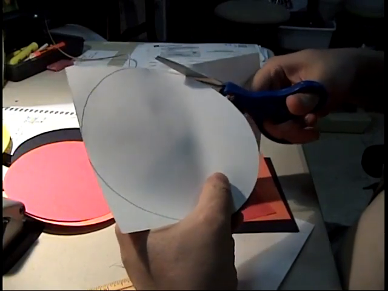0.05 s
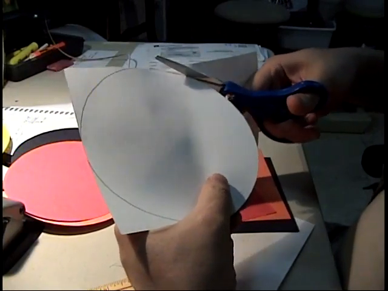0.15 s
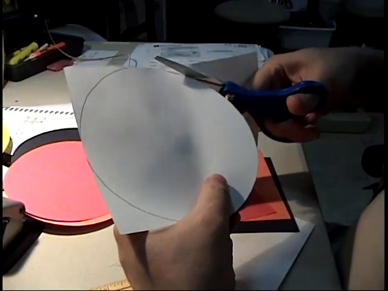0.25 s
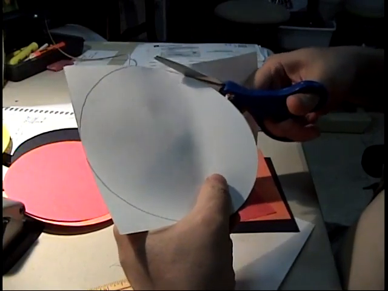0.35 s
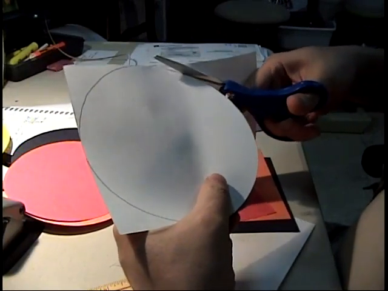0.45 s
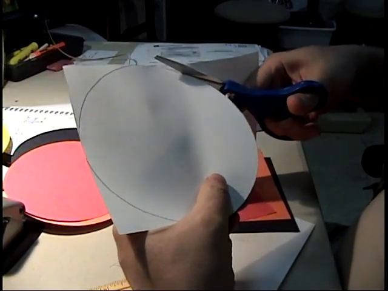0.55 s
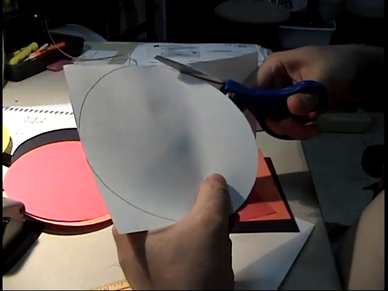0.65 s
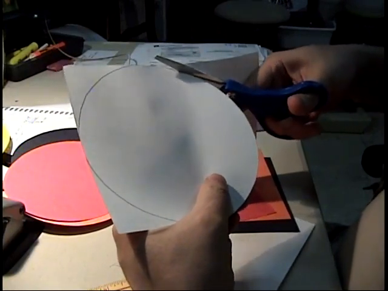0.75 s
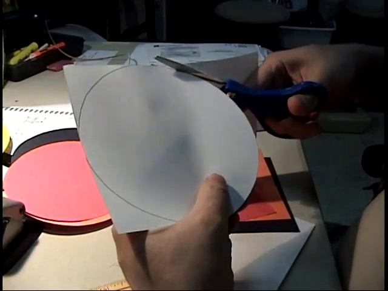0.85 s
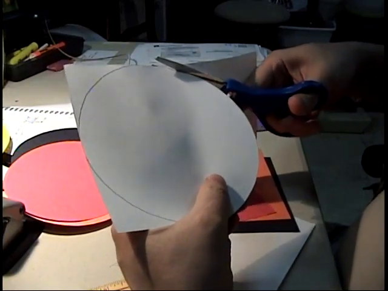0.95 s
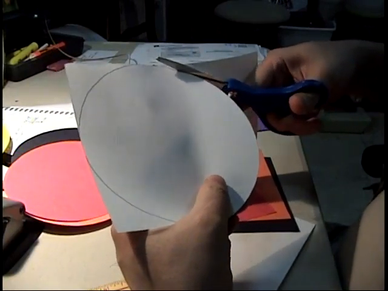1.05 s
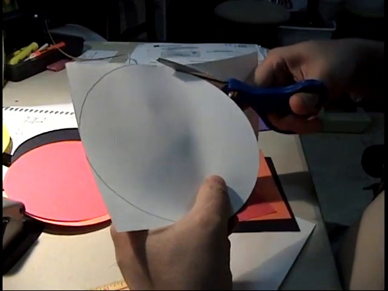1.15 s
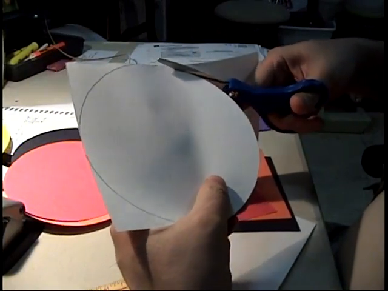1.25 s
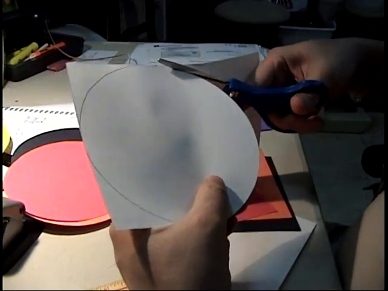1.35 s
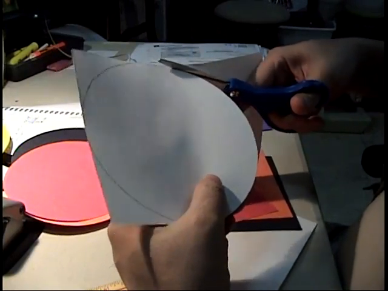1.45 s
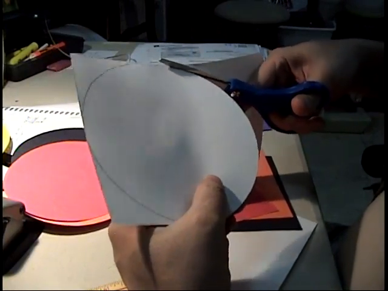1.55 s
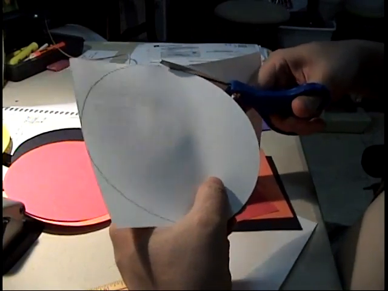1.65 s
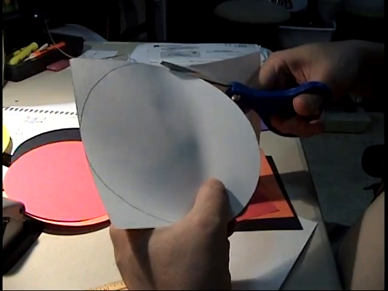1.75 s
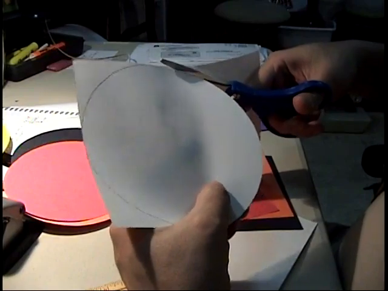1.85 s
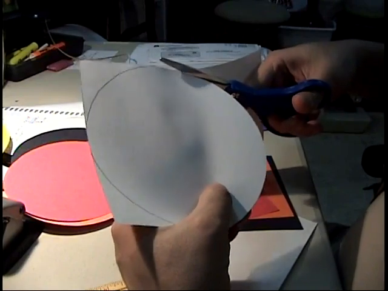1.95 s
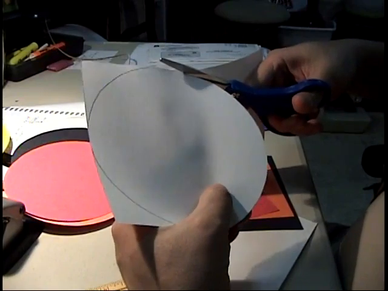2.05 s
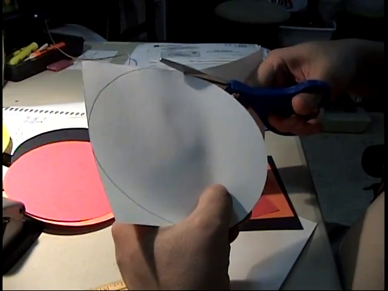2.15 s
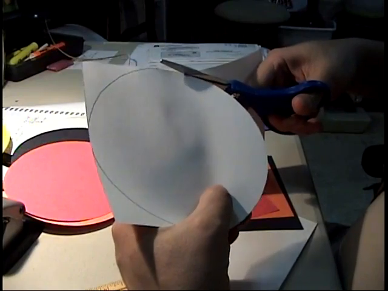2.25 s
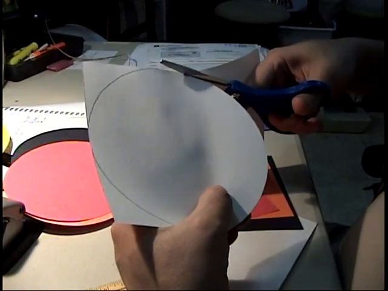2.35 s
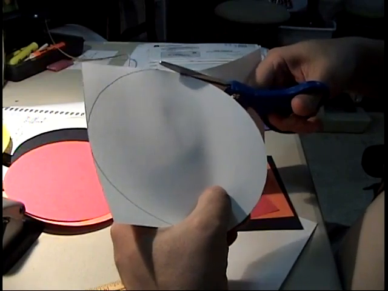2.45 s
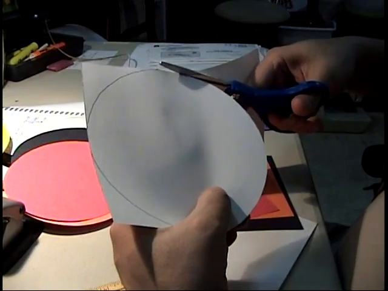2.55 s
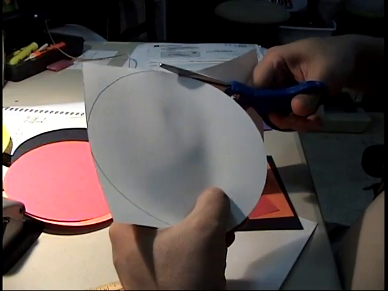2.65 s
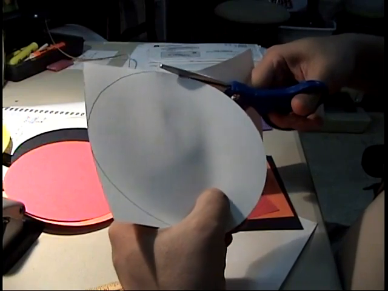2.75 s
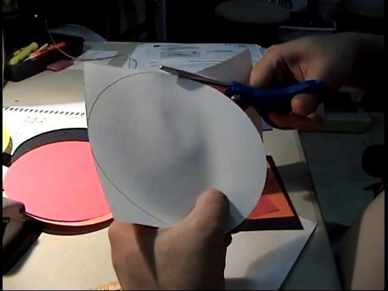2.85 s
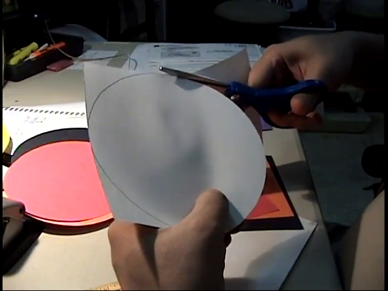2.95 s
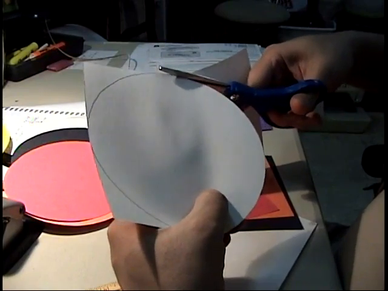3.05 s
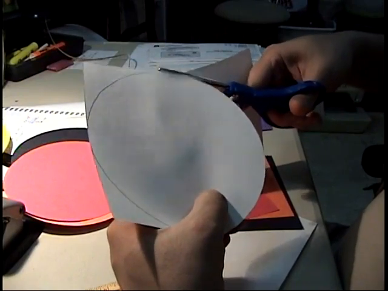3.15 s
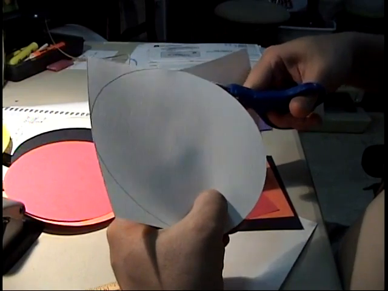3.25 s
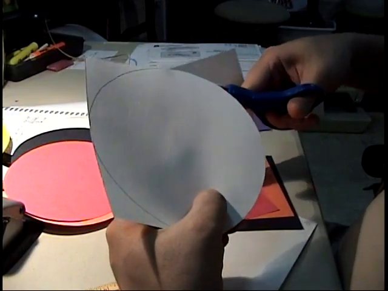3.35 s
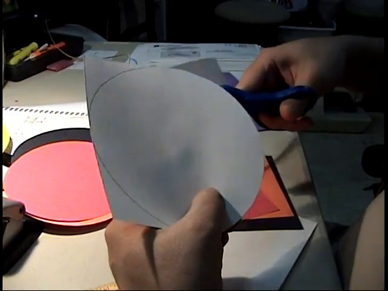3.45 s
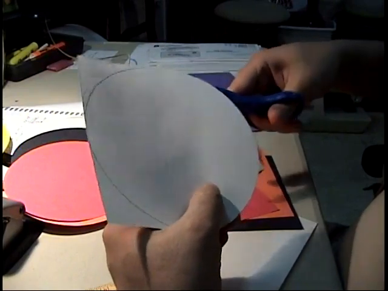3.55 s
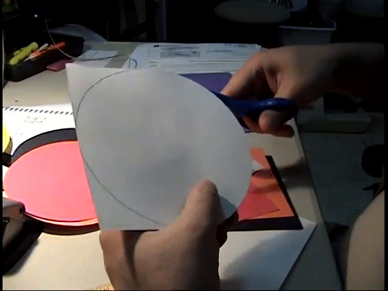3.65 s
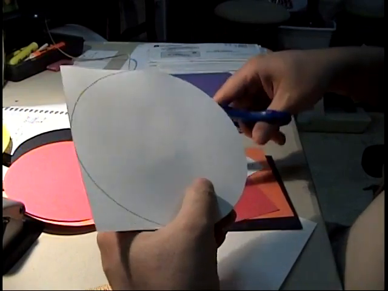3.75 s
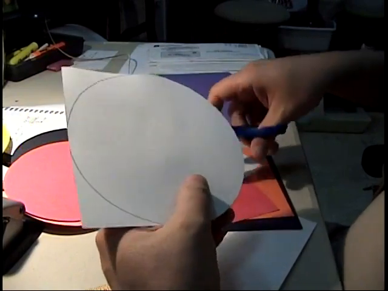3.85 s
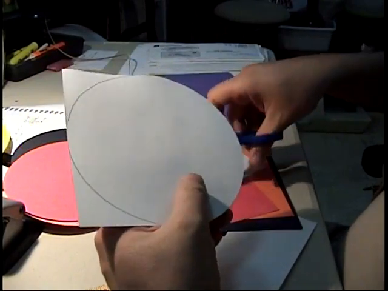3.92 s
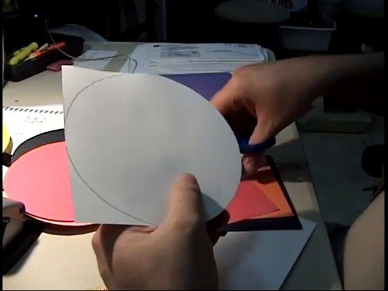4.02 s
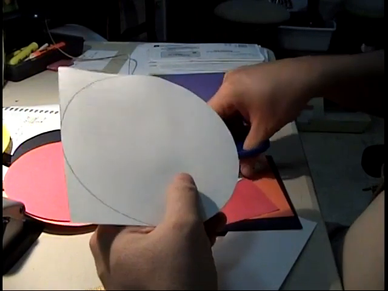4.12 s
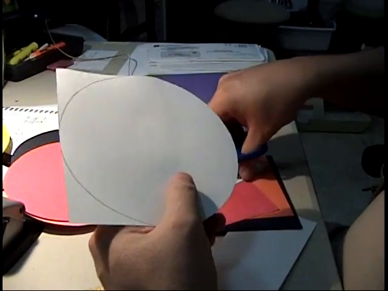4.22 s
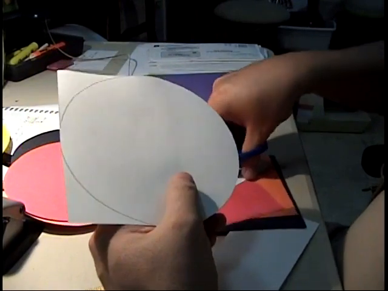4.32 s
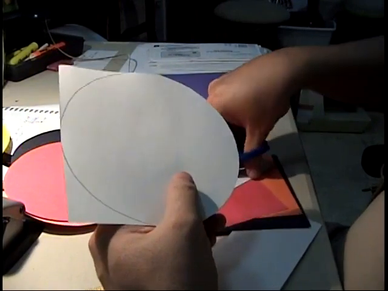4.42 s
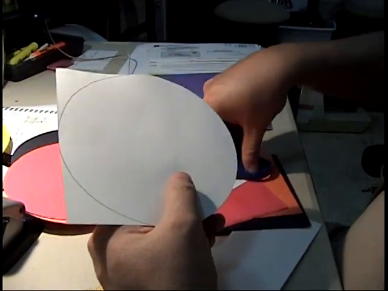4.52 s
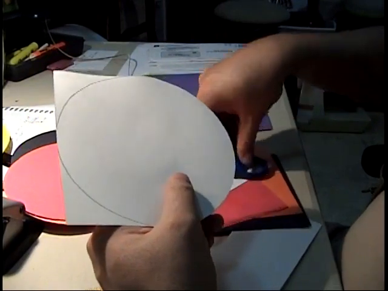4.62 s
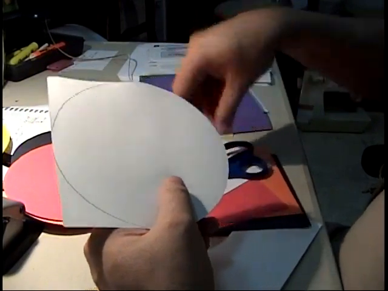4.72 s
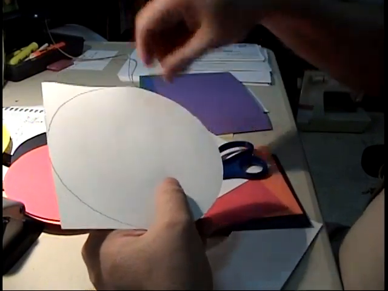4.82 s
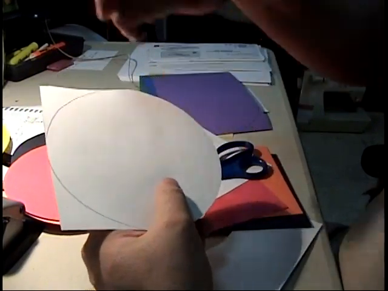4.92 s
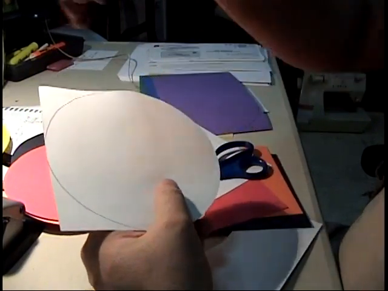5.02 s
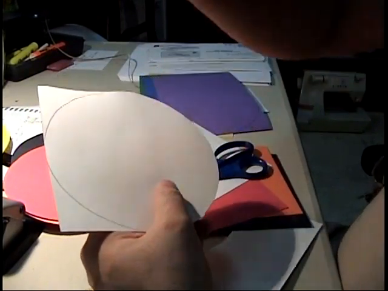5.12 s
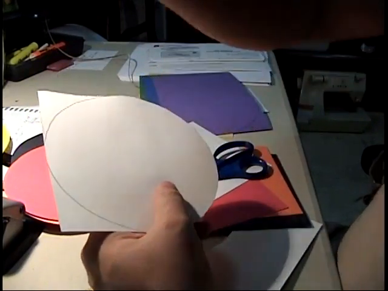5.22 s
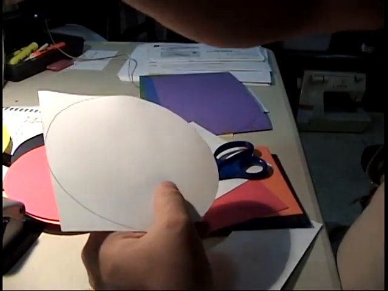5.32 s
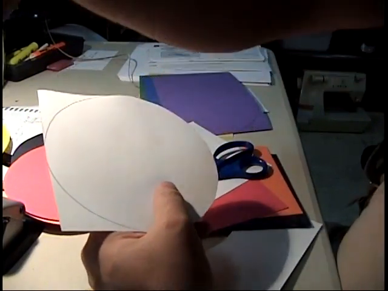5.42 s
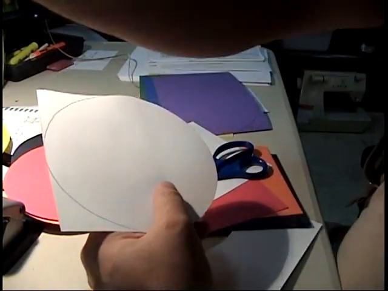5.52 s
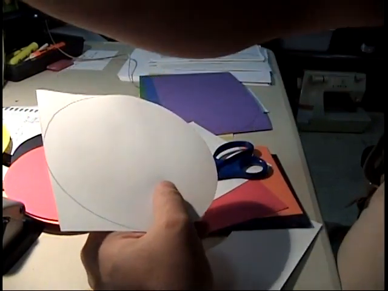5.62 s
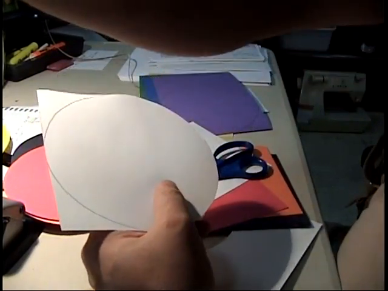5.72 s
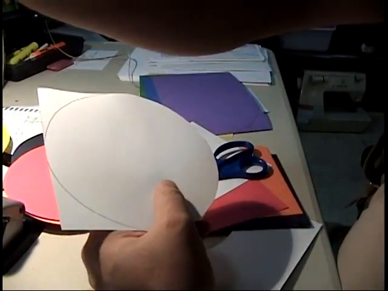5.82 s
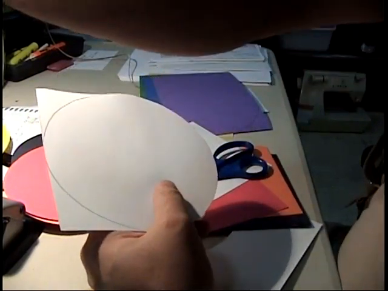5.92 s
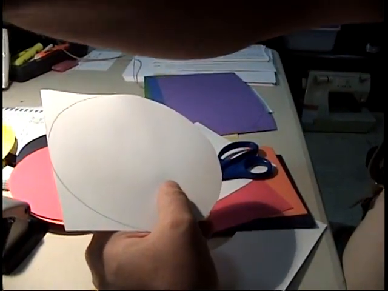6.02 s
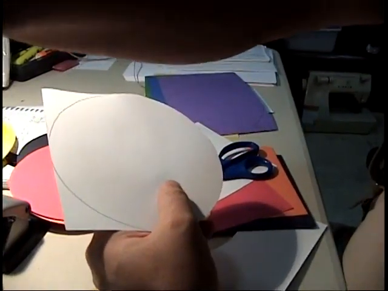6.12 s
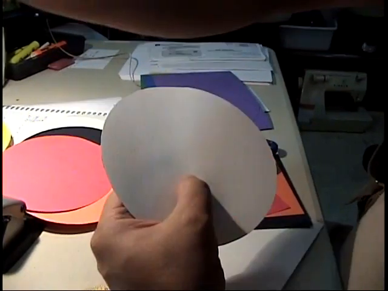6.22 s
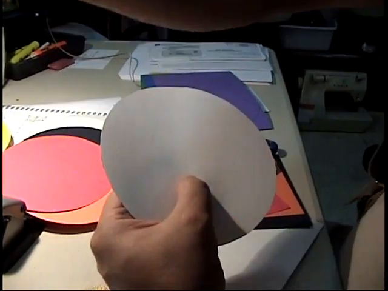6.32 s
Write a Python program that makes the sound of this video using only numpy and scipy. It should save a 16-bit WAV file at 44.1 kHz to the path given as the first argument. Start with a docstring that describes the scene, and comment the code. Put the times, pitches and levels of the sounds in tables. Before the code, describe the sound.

Crisp little scissor cuts and paper crinkles, a couple of knocks on a desk, then close plastic clicks in a quiet room.

```python
"""For three seconds scissors cut round a sheet of paper held over a desk: fibres snap in small bursts,
steel rasps on the edge, the sheet crinkles and the handles knock shut. Fingers brush the sheet.
At 4 s the scissors are laid down, clacking and booming in the desk top. An arm rustles across, and
near 6 s a hand clicks against plastic right by the microphones. A quiet room hums throughout,
with a thin electrical whine and a buzz that creeps up at the end."""
import sys
import numpy as np
from scipy import signal
from scipy.fft import rfft, irfft, next_fast_len
from scipy.io import wavfile
from scipy.ndimage import map_coordinates

SR = 44100
rng = np.random.default_rng(int(sys.argv[2]) if len(sys.argv) > 2 else 0)


def to_wav(s):
    """Save 16-bit WAV."""
    ch = np.atleast_2d(s).T  # columns
    pcm = np.round(np.clip(ch, -1, 1) * 32767)  # PCM
    wavfile.write(sys.argv[1], SR, pcm.astype(np.int16))


N = 281358

# Loudest bites into the paper. Each row: start in seconds, level in dB, length in seconds.
SNAPS = [(0.307, -34, 0.0046), (.314, -36.5, 0.0091), (.395, -40, 0.0034), (0.472, -41.5, 0.0085),
         (0.5054, -35, 0.01), (.56, -37.5, 0.0066), (0.593, -43, 0.011), (.635, -43.5, 0.005),
         (.661, -42.5, .005), (0.693, -40.5, 0.0031), (.759, -38.5, 0.0074), (1.021, -32.5, 0.013),
         (1.046, -39.5, .0096), (1.081, -36, 0.0044), (1.098, -37, 0.015), (1.214, -31.5, 0.0051),
         (1.2395, -33, 0.011), (1.285, -39, 0.015), (1.303, -37.5, .0075), (1.438, -30.5, 0.0098),
         (1.475, -33.5, 0.012), (1.487, -32, 0.0064), (2.401, -36, 0.005), (2.503, -40.5, .011),
         (2.864, -38.5, 0.0078), (2.99, -30.5, 0.0033), (3.013, -36, 0.0089), (3.0685, -27, 0.0084),
         (3.532, -43.5, 0.0044)]
# Each row: frequency in Hz, level in dB.
FIBRE_SPECTRUM = [(120, -47), (200, -9), (503, -6), (1070, 4), (1720, 0.5), (2950, -8.5), (3940, -6),
                  (4470, -23.5), (4980, -3.5), (5660, -9.5), (6300, -6), (8260, -14), (8880, -17.5),
                  (12700, -16.5), (15000, -53)]
# Each row: frequency in Hz, width in Hz, level in dB.
BLADE_MODES = [(4540, 150, 0), (6350, 300, -19), (8780, 300, -20)]
# How freely the blades ring. Each row: time in seconds, level in dB relative to the snap.
BLADE_RING = [(.3, -12), (.5, -6), (.68, 2.5), (.8, -3), (1.02, -13), (1.6, -20), (3.1, -18)]
SNAP_PIVOT_DB_PER_OCT, SNAP_TIP_DB_PER_OCT = 2, -1
USUAL_SNAP_DB, THINNING_PER_OCT = -42, 0.11


def cutting():
    """Each advance of the blades breaks a burst of fibres; the sheet radiates it and the steel rings."""
    out, t = np.zeros((2, N)), np.arange(SR // 16) / SR
    steel = ringing(BLADE_MODES, t)
    for s, db, length_s in SNAPS + slips():
        tilt = cut_tilt(s, SNAP_PIVOT_DB_PER_OCT, SNAP_TIP_DB_PER_OCT)
        tilt += THINNING_PER_OCT * (USUAL_SNAP_DB - db)  # smaller snaps are thinner
        envelope = np.exp(-2 * t / length_s) * (1 - np.exp(-t / 0.00039))
        ruptures = fibres(len(t), spiky_db=4.5) * envelope
        sheet = unit(coloured(ruptures, tilted(FIBRE_SPECTRUM, tilt)))
        blade = unit(convolved(ruptures, steel))
        burst = sheet + amp(at_time(BLADE_RING, s)) * blade
        add(out, s, amp(db - 3.5) * burst * np.sqrt(np.mean(envelope ** 2)))
    return spread(out, NEAR_SIDE)


# Each row: start in seconds, end in seconds, slip level in dB.
SQUEEZES = [(0.512, .74, -47.5), (0.772, .8, -38.5), (1.221, 1.34, -41), (2.291, 2.391, -48),
            (2.55, 2.866, -50.5)]
SLIPS_PER_S, SLIP_S, SLIP_SCATTER_DB = 45, 0.0052, 2


def slips():
    """Squeezed blades stick and slip, giving more rows of tiny snaps."""
    return [(s, db + SLIP_SCATTER_DB * rng.standard_normal(), SLIP_S)
            for start, end, db in SQUEEZES
            for s in scattered(start, end, count=round((end - start) * SLIPS_PER_S))]


# The blades close twice. Each row: time in seconds, place of the cut from pivot 0 to tips 1.
CUT_PLACE = [(.25, .1), (.75, .3), (1.5, 1), (1.7, 1), (1.8, 0), (2.3, .4), (2.85, .5), (3.1, 1), (3.5, 0)]


def cut_tilt(s, pivot_db_per_oct, tip_db_per_oct):
    """The cut dulls as it travels from the pivot to the tips."""
    return pivot_db_per_oct + (tip_db_per_oct - pivot_db_per_oct) * at_time(CUT_PLACE, s)


# Steel on paper. Each row: frequency in Hz, level in dB.
RASP_SPECTRUM = [(120, -71), (200, 1), (550, 2), (789, -18), (864, 3), (1090, 0), (3800, -9), (4720, -11),
                 (8880, -15), (12500, -26.5), (15000, -35)]


def rasp_colour(s, db_per_oct):
    """Spectrum of a blade sliding on paper, lifted where the steel rings."""
    ring = 4 * amp(at_time(BLADE_RING, s))

    def level_db(hz):
        steel = sum(amp(db) / np.hypot(1, 2 * (hz - centre) / width) for centre, width, db in BLADE_MODES)
        return tilted(RASP_SPECTRUM, db_per_oct)(hz) + 20 * np.log10(1 + ring * steel)
    return level_db


# Slides without a bite. Each row: middle in seconds, level in dB, half length in seconds.
BLADE_RUBS = [(0.018, -51, 0.012), (0.283, -52.5, 0.011), (1.376, -54, 0.015), (1.535, -53.5, 0.012),
              (1.649, -55.5, 0.052), (1.721, -51.5, 0.017), (1.76, -45, .011), (1.795, -43, .017),
              (1.873, -46.5, 0.0094), (1.901, -51, 0.026), (2.093, -58, 0.03), (2.221, -55, .007),
              (2.285, -53.5, 0.009), (2.32, -50.5, 0.0098), (2.375, -52.5, .0094), (2.648, -51.5, 0.017),
              (2.735, -50, .016), (2.849, -56, 0.034), (3.065, -48, 0.011)]
FINGER_BRUSHES = [(3.447, -59, 0.035), (3.594, -55, 0.024), (3.75, -61.5, 0.072), (3.915, -64.5, 0.1),
                  (4.254, -56.5, 0.06)]
# Each row: frequency in Hz, level in dB.
SKIN_SPECTRUM = [(300, -5), (1500, 3), (2600, -3), (3500, -1.5), (4300, -4.5), (5800, 3), (7200, -3),
                 (9000, -6), (12000, -15.5), (15000, -28)]
ARM_SPECTRUM = [(300, -9), (1300, 2), (2600, -1), (6000, -2), (10000, -9), (15000, -24)]
USUAL_RUB_DB, RUB_DB_PER_OCT, BRIGHTENING_PER_OCT = -51.5, -0.3, 0.42
GLIDE_DB, GLIDE_LAG_S, GLIDE_HALF_S = -21.5, 0.006, 0.011  # rasp round a bite, relative to it
ARM_S, ARM_DB, ARM_HALF_S = 5.25, -64, 0.2


def rubbing():
    """Steel rasps along the paper's edge; fingers hiss on sheet and handles; a reaching arm rustles."""
    out = np.zeros((2, N))
    # a faster slide is louder and brighter
    slides = [(s, db, half_s, RUB_DB_PER_OCT + BRIGHTENING_PER_OCT * (db - USUAL_RUB_DB))
              for s, db, half_s in BLADE_RUBS]
    for s, db, _ in SNAPS:
        tilt = cut_tilt(s, pivot_db_per_oct=-1, tip_db_per_oct=-2.5)
        slides.append((s + GLIDE_LAG_S, db + GLIDE_DB, GLIDE_HALF_S, tilt))
    for s, db, half_s, tilt in slides:
        add_stroke(out, s, db, half_s, rasp_colour(s, tilt), spiky_db=5, clumps_db=3, size=SR // 4)
    for s, db, half_s in FINGER_BRUSHES:
        add_stroke(out, s, db, half_s, curve(SKIN_SPECTRUM), spiky_db=1.5, clumps_db=2.5)
    add_stroke(out, ARM_S, ARM_DB, ARM_HALF_S, curve(ARM_SPECTRUM), spiky_db=0, clumps_db=2.7)
    return spread(out, NEAR_SIDE)


def add_stroke(track, middle_s, db, half_s, colour, spiky_db, clumps_db, size=SR):
    """A slide swells and fades, its grain clumping where the surfaces catch."""
    t = (np.arange(size) - size // 2) / SR
    catching = amp(clumps_db * wobble(219, size))
    grain = unit(coloured(fibres(size, spiky_db) * catching, colour))
    swell = np.exp(-0.5 * (t / half_s) ** 2)
    add(track, middle_s - size / SR / 2, amp(db) * grain * swell)


# Each row: start in seconds, peak in dB.
CRINKLES = [(1.5251, -40.5), (1.5775, -41.5), (1.6472, -39), (1.699, -39), (3.472, -45.5), (4.921, -48.5)]
# Each row: start in seconds, end in seconds.
SHEET_TURNS = [(.17, 0.24), (0.329, 0.4), (0.811, .87), (2.031, 2.08)]
CRINKLE_HZ, CRINKLE_WIDTH_HZ, FAINT_CRINKLE_DB = 1950, 750, -47


def crinkling():
    """The sheet buckles, sending ticks through one broad resonance; fainter ones come as it turns."""
    out, t = np.zeros((2, N)), np.arange(SR // 12) / SR
    faint = [(s, FAINT_CRINKLE_DB) for turn in SHEET_TURNS for s in scattered(*turn, count=2)]
    for s, db in CRINKLES + faint:
        hz = CRINKLE_HZ * np.exp(0.1 * rng.standard_normal())
        ticks = fibres(len(t), spiky_db=5.5) * np.exp(-t / 0.01)
        buckle = convolved(ticks, ringing([(hz, CRINKLE_WIDTH_HZ, 0)], t))
        add(out, s, amp(db) * buckle / np.abs(buckle).max())
    return spread(out, NEAR_SIDE)


# Handles and flexing sheet. Each row: start in seconds, level in dB, low-pass corner in Hz.
KNOCKS = [(1.3481, -31.5, 603), (1.598, -32.5, 450), (1.622, -36, 328), (1.653, -38.5, 500),
          (3.0994, -22.5, 2580)]
# Each row: frequency in Hz, level in dB.
HANDLE_SPECTRUM = [(60, -16), (150, -5.5), (270, 4.5), (420, -6.5), (520, 8), (680, -14), (860, 2.5),
                   (1280, 1), (1720, -3.5), (2100, -19), (2600, -21), (3200, -28), (9000, -41)]


def handles():
    """A knock is a damped thock with a brief rattle of the plastic."""
    out, t = np.zeros((2, N)), np.arange(SR // 8) / SR
    for s, db, corner_hz in KNOCKS:
        blow = contact(t, chatter=0.19, decay_s=0.0077)
        thock = soften(coloured(blow, curve(HANDLE_SPECTRUM)), corner_hz)
        add(out, s, 7 * amp(db) * thock / np.linalg.norm(thock[0]))
    return spread(out, NEAR_SIDE)


# Each row: start in seconds, ring gain in dB, ring low-pass in Hz, clack gain in dB, clack low-pass in Hz.
DESK_BLOWS = [(4.066, -25.5, 5000, -15, 7550), (4.0851, -34.5, 2000, -22.5, 1760),
              (4.107, -35, 900, -34, 905), (4.3892, -18, 307, -22, 960), (4.4183, -31, 200, -27.5, 675),
              (4.51, -51, 398, -42, 1040)]
# Each row: frequency in Hz, level in dB, T60 in seconds.
DESK_MODES = [(135.7, -1, 0.22), (160, -10, 0.23), (200.3, -5.5, 0.14), (343.5, -10, 0.17), (401, -8, .14),
              (476, -3, 0.034), (546, -15, 0.15), (594, -12, 0.11), (664, -8.5, 0.16), (744, -13, 0.29),
              (818, -12, 0.26), (1030, -8, 0.067), (1160, -11, .12), (1270, -3.5, 0.13), (1380, -13, .09),
              (1835, -7, 0.08), (2010, -20, .17), (2200, -27, 0.12), (2681, -19, .14)]
# Each row: frequency in Hz, level in dB.
CLACK_SPECTRUM = [(60, -8), (150, 2), (600, -7), (1300, -2.5), (1900, -7.5), (2700, -3), (3300, -11.5),
                  (4700, -14), (6000, -15), (10000, -17), (15000, -16)]


def desk():
    """Hard tips clack and bounce; the softer handles then drop and boom in the desk top."""
    out, t = np.zeros((2, N)), np.arange(SR // 2) / SR
    for s, ring_db, ring_hz, clack_db, clack_hz in DESK_BLOWS:
        ring = sum((-1) ** k * amp(db + rng.normal(0, 1) - 60 * t / t60) * np.sin(2 * np.pi * hz * t)
                   for k, (hz, db, t60) in enumerate(DESK_MODES))
        crack = contact(t, chatter=0.084, decay_s=0.0016)
        dull_chatter = soften(noise_burst(t, decay_s=0.0063), corner_hz=1420)
        clack = coloured(22 * crack + 6 * dull_chatter, curve(CLACK_SPECTRUM))
        clack = soften(spread(clack, NEAR_SIDE), clack_hz, order=3)
        add(out, s, amp(ring_db) * soften(ring, ring_hz) + amp(clack_db) * clack)
    # the desk top is too small to radiate deep bass
    return signal.lfilter(*signal.butter(3, 88, 'high', fs=SR), out)


# Each row: start in seconds, level in dB, left minus right in dB, low-pass corner in Hz.
CLICKS = [(5.81, -36, 2, 5000), (5.8884, -29, 9, 9100), (5.8902, -46, -5, 1800), (5.911, -24, 5, 3160),
          (5.9957, -27, 10, 1280), (6.014, -44, -3, 5000), (6.0446, -8.5, -2.5, 3670),
          (6.114, -35.5, 4, 2530), (6.157, -38, 6, 1300)]
# Each row: frequency in Hz, level in dB.
CASING_SPECTRUM = [(100, -22), (280, -6), (600, -1), (800, -0.5), (1080, 9.5), (1270, 1.5), (1430, 1.5),
                   (1950, -4), (2500, -2), (3300, -11), (6200, -14.5), (9800, -12.5), (15000, -36)]
ROCK_LAG_S = 0.00012


def clicks():
    """Plastic clicks so near that it shakes the two microphones in largely opposite senses."""
    out, t = np.zeros((2, N)), np.arange(SR // 16) / SR
    for s, db, pan_db, corner_hz in CLICKS:
        push = contact(t, chatter=0.2, decay_s=0.0015)[0]
        rock = np.roll(contact(t, chatter=0.15, decay_s=0.0012)[0], round(ROCK_LAG_S * SR))
        lingering_mids = soften(noise_burst(t, decay_s=0.0042), corner_hz=1520)
        pair = np.array([1.1 * push + rock, 0.34 * push - rock]) + 0.16 * lingering_mids
        pair = soften(coloured(pair, curve(CASING_SPECTRUM)), corner_hz, order=1)
        pair /= np.linalg.norm(pair, axis=1, keepdims=True)
        add(out, s, 5 * amp(db) * amp([[pan_db / 2], [-pan_db / 2]]) * pair)
    return out


# Each row: frequency in Hz, T60 in seconds.
ROOM_DECAY = [(150, 0.42), (1000, 0.27), (4000, 0.26), (12000, 0.16)]
PREDELAY_S = 0.0036


def room(x):
    """The small room reverberates, dying sooner in the treble."""
    hz, t, noise = signal.stft(rng.standard_normal((2, SR // 2)), SR, nperseg=256)
    t60 = curve(ROOM_DECAY)(hz)[:, None]
    tail = signal.istft(noise * amp(-60 * t / t60), SR, nperseg=256)[1]
    tail = spread(tail / np.linalg.norm(tail[0]), ROOM_SIDE)
    delayed = np.pad(x.mean(axis=0), (round(PREDELAY_S * SR), 0))
    return signal.fftconvolve(delayed[None], tail, axes=1)[:, :N]


# Each row: frequency in Hz, level in dB.
AIR_SPECTRUM = [(12, -51), (20, -12.5), (59, 0.5), (90, -5), (158, -5), (181, -3), (539, -9), (969, -13.5),
                (1350, -15), (1560, -21.5), (6470, -29), (7230, -31.5), (8090, -30.5), (14500, -44.5),
                (15800, -34)]
# Each row: frequency in Hz, rms level in dB.
HUM_TONES = [(59.2, -65.5), (156.1, -64)]
WHINE_TONES = [(6374, -80.5), (15735, -84)]
AIR_DB = -55
SWITCHING_HZ, SWITCHING_DB, FLIPS_PER_S = 7867, -73, 30


def background():
    """Room air, a wavering hum, and a thin electrical whine whose strongest tone flips polarity."""
    t = np.arange(N) / SR
    air = filtered(rng.standard_normal((2, N)), lambda hz: amp(curve(AIR_SPECTRUM)(hz)))
    hum = sum(amp(db + 2.3 * wobble(5)) * np.sin(2 * np.pi * hz * t + 0.52 * wobble(4.64))
              for hz, db in HUM_TONES)
    whine = sum(amp(db + wobble(25)) * np.sin(2 * np.pi * hz * t + 0.3 * wobble(20))
                for hz, db in WHINE_TONES)
    polarity = np.tanh(10 * np.sin(np.pi * FLIPS_PER_S * t))
    switching = amp(SWITCHING_DB) * np.sin(2 * np.pi * SWITCHING_HZ * t) * polarity
    air = amp(AIR_DB + 0.69 * wobble(2.895)) * spread(unit(air), ROOM_SIDE)
    return air + np.sqrt(2) * (hum + whine + switching)


# Each row: time in seconds, level in dB.
BUZZ_LEVEL = [(0, -90.5), (4.6, -90.5), (5.4, -84), (6.0, -79), (6.1, -76.5), (6.38, -73)]
# Each row: frequency in Hz, partial gain in dB.
BUZZ_EARLY_SPECTRUM = [(2400, -39), (3600, -37), (3900, -10), (4200, 3), (4500, -19), (4800, 2), (5100, 4),
                       (5400, 6.5), (5700, 1.5), (7200, -2)]
BUZZ_LATE_SPECTRUM = [(2400, -5), (3000, -21), (3300, -1.5), (3600, 0), (3900, -6), (4500, -4), (4800, -2),
                      (5100, -2), (5400, -2), (5700, -8), (7200, -9)]
BUZZ_HZ, BUZZ_CHANGE_S, BUZZ_FADE_S = 299.7, 6.05, 0.03


def buzz():
    """An electrical buzz, high partials only, creeps up towards the end and changes colour."""
    t, tone = np.arange(N) / SR, np.zeros(N)
    blend = np.clip((t - BUZZ_CHANGE_S) / BUZZ_FADE_S, 0, 1)
    early_db, late_db = curve(BUZZ_EARLY_SPECTRUM), curve(BUZZ_LATE_SPECTRUM)
    for hz in BUZZ_HZ * np.arange(8, 25):
        gain = (1 - blend) * amp(early_db(hz)) + blend * amp(late_db(hz))
        tone += gain * np.sin(2 * np.pi * (hz * t + rng.random()))
    return np.sqrt(2) * amp(at_time(BUZZ_LEVEL, t)) * tone


# Stereo width. Each row: frequency in Hz, side gain in dB.
NEAR_SIDE = [(100, -42), (400, -10), (1500, -26), (5000, -13.5), (12000, -8)]
ROOM_SIDE = [(60, -18), (150, -13), (300, -10.5), (1000, 0.5), (4000, -1), (12000, -3.5)]


def spread(pair, side_db):
    """Mid and side to left and right."""
    side = filtered(pair[1], lambda hz: amp(curve(side_db)(hz)))
    return np.array([pair[0] + side, pair[0] - side])


def fibres(size, spiky_db):
    """Two trains of tiny ruptures, a few much larger than the rest."""
    return rng.standard_normal((2, size)) * amp(spiky_db * np.clip(rng.standard_normal(size), -2, 2))


def contact(t, chatter, decay_s):
    """One sharp push, then dying chatter, as mid and side."""
    blow = chatter * noise_burst(t, decay_s)
    blow[0, 0] += 1
    return blow


def noise_burst(t, decay_s):
    return rng.standard_normal((2, len(t))) * np.exp(-t / decay_s)


def ringing(modes, t):
    """Impulse response of damped resonances."""
    return sum(width_hz * amp(db) * np.exp(-np.pi * width_hz * t) * np.sin(2 * np.pi * hz * t)
               for hz, width_hz, db in modes)


def soften(x, corner_hz, order=2):
    """A soft contact leaves out the treble."""
    return signal.lfilter(*signal.butter(order, corner_hz, fs=SR), x)


def coloured(x, level_db, size=2048):
    """Minimum-phase filter with gain level_db(hz)."""
    cepstrum = irfft(np.log(amp(level_db(np.fft.rfftfreq(size, 1 / SR))) + 1e-6))
    cepstrum[1:size // 2] *= 2
    cepstrum[size // 2 + 1:] = 0
    return convolved(x, irfft(np.exp(rfft(cepstrum))))


def convolved(pair, impulse):
    return signal.fftconvolve(pair, impulse[None], axes=1)[:, :pair.shape[-1]]


def filtered(x, gain):
    """Zero-phase filter with linear gain(hz)."""
    size = next_fast_len(x.shape[-1] + SR // 10)
    return irfft(rfft(x, size) * gain(np.fft.rfftfreq(size, 1 / SR)), size)[..., :x.shape[-1]]


def curve(points):
    """A table as a function of Hz, interpolated on a log axis."""
    knots_hz, values = np.transpose(points)
    return lambda hz: np.interp(np.log(hz + 1), np.log(knots_hz + 1), values)


def tilted(spectrum, db_per_oct):
    """A spectrum's curve leaning about 3 kHz."""
    return lambda hz: curve(spectrum)(hz) + db_per_oct * np.log2(np.clip(hz, 500, 12000) / 3000)


def at_time(points, s):
    return np.interp(s, *np.transpose(points))


def scattered(start_s, end_s, count):
    """Unevenly spaced moments across a span."""
    return start_s + (end_s - start_s) * (np.arange(count) + rng.random(count)) / count


def wobble(knots_per_s, size=N):
    """A smooth random curve."""
    knots = rng.standard_normal(int(size * knots_per_s / SR) + 4)
    return map_coordinates(knots, [np.arange(size) * knots_per_s / SR])


def amp(db):
    return 10 ** (np.asarray(db) / 20)


def unit(x):
    """Scale to rms 1."""
    return x / np.sqrt(np.mean(x ** 2) + 1e-20)


def add(track, start_s, x):
    i = round(start_s * SR)
    x = x[..., max(-i, 0):N - i]
    track[..., max(i, 0):max(i, 0) + x.shape[-1]] += x


def scene():
    """Paper, scissors and desk in the room, with the clicks close by."""
    paper = cutting() + rubbing() + crinkling()
    knocks = desk() + handles()
    near = clicks()
    reverb = room(amp(-12) * paper + amp(-11) * knocks + amp(-43) * near)
    return paper + knocks + near + reverb + background() + buzz()


TOP_HZ = 15950


def record(dry):
    """Brick-wall low-pass."""
    return filtered(dry, lambda hz: hz < TOP_HZ)


dry = scene()
out = record(dry)
to_wav(out)
```